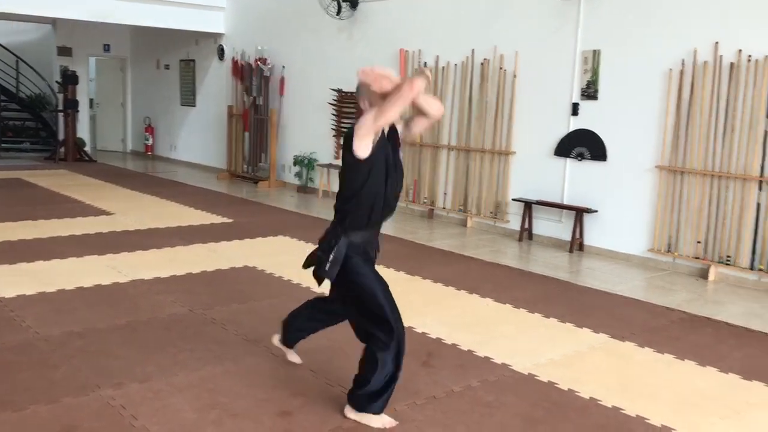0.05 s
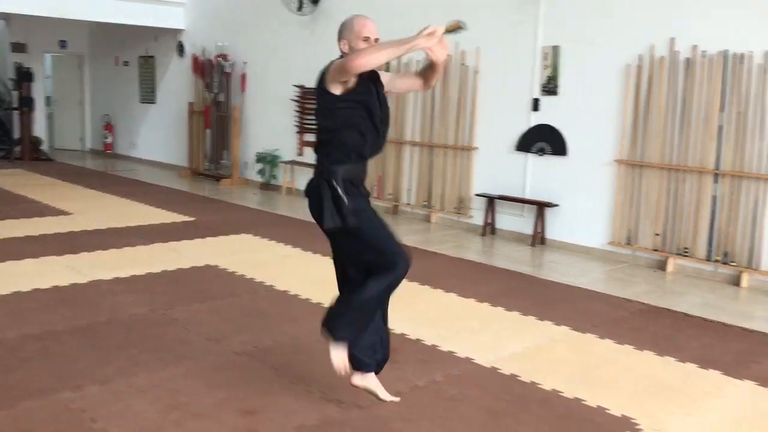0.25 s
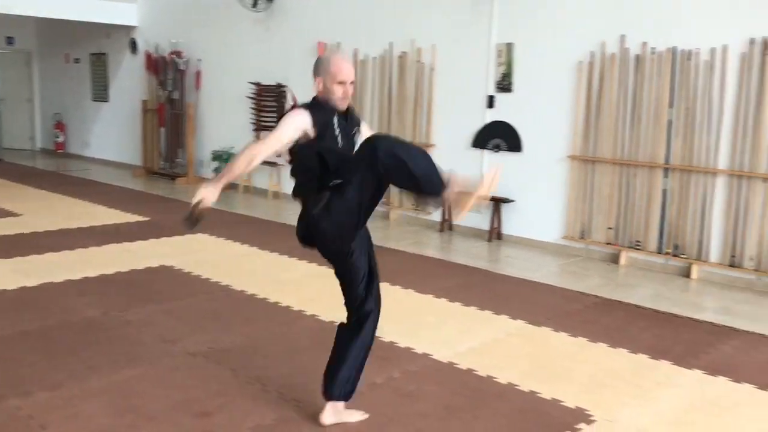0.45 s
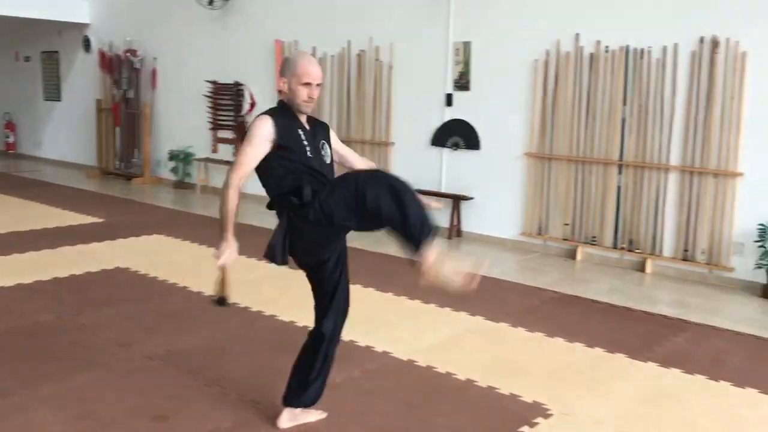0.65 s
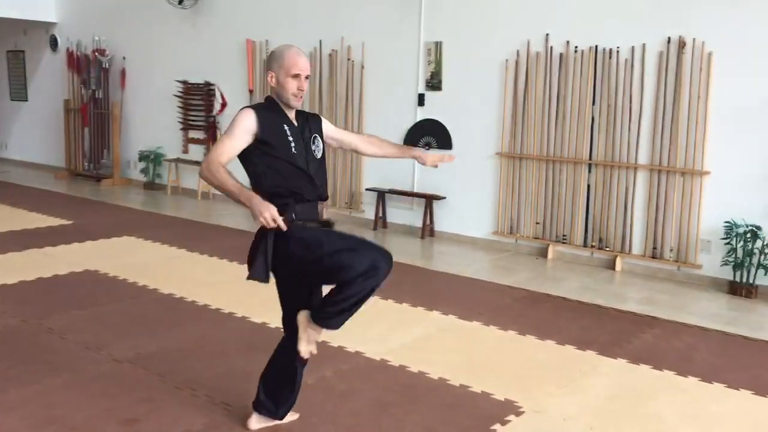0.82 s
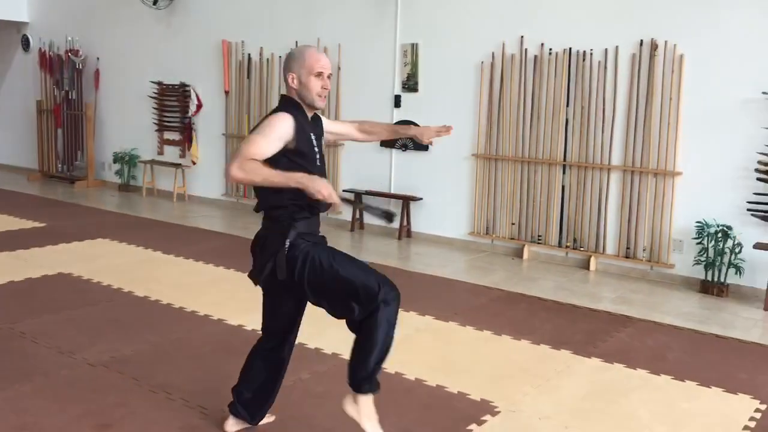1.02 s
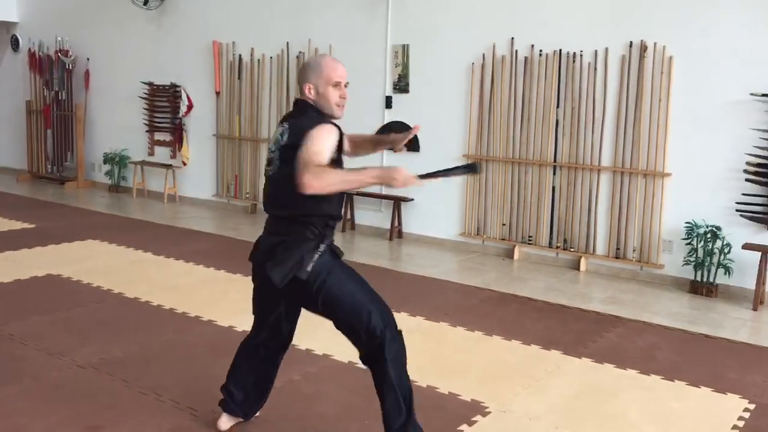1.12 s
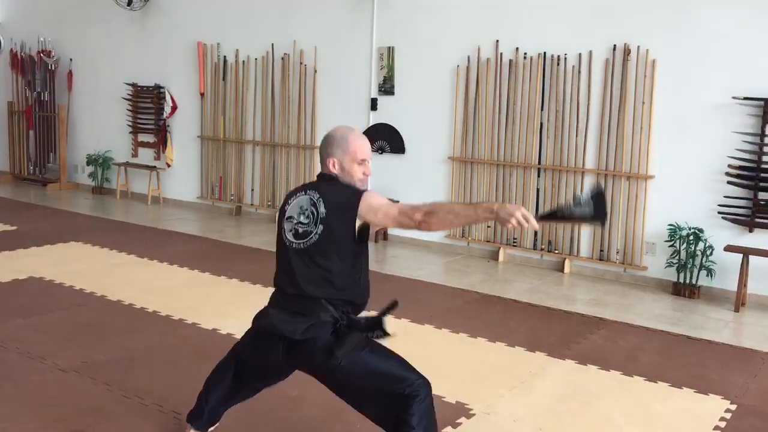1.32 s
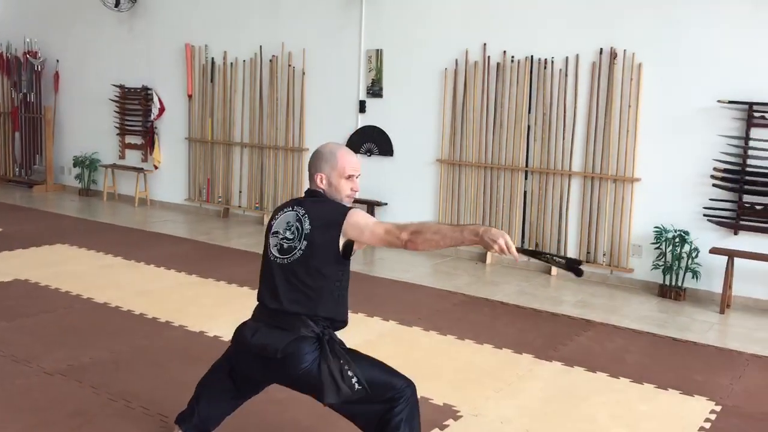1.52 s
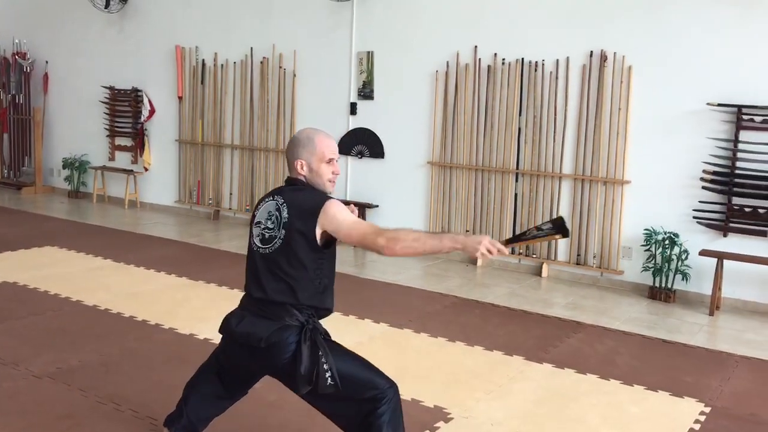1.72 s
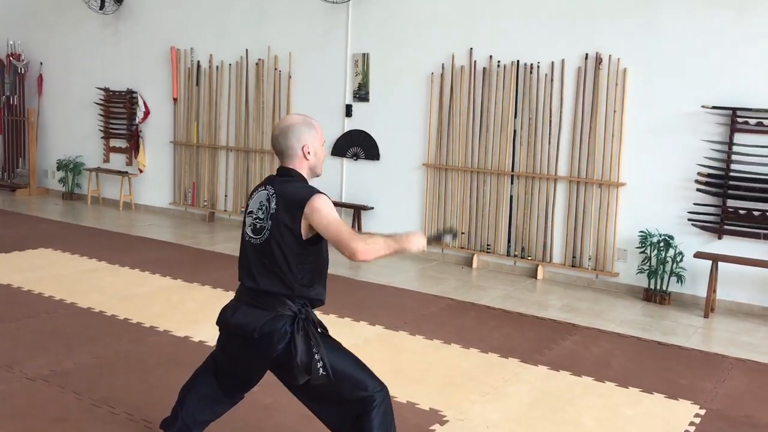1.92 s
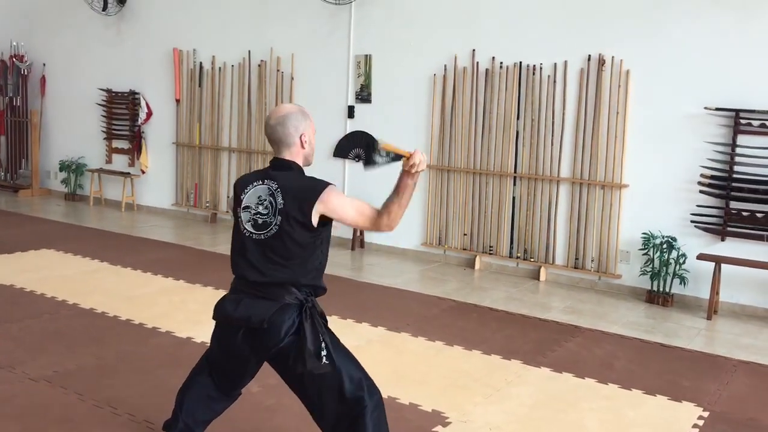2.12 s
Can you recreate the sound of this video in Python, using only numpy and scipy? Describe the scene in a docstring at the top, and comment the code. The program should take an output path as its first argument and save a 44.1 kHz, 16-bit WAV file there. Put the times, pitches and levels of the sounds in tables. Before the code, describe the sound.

A hand fan cracks open after faint clothing swishes, echoing through a training hall.

```python
"""A folding fan snapped open in a hall

A martial artist kicks, steps into a low stance and snaps a fan open in a large, hard-walled hall.
The ribs slide apart, then the leaf cracks taut twice, 8 ms apart; the floor mirrors each crack and
the hall reverberates. Before it come swishes of clothing and a few light slaps, over low thudding
of the mats and steady room noise."""
import sys
import numpy as np
from scipy import signal
from scipy.fft import rfft, irfft, next_fast_len
from scipy.io import wavfile
from scipy.ndimage import uniform_filter1d

SR = 44100
rng = np.random.default_rng(int(sys.argv[2]) if len(sys.argv) > 2 else 0)


def output_pcm(signal):
    """Save a mono or channel-first signal as 16-bit PCM at the path in sys.argv[1].

    Samples are clipped to [-1, 1] before scaling.
    """
    pcm = np.clip(np.atleast_2d(signal).T, -1, 1) * 32767
    wavfile.write(sys.argv[1], SR, np.round(pcm).astype(np.int16))


N = 94815

# Cracks of the leaf. Each row: start in seconds, level in dB, rise and decay of the rib clatter in
# seconds, clatter relative to the pulse in dB, low cutoff in Hz.
CRACK_EVENTS = [(1.3917, 2.03, 0.000053, 0.00034, -12, 2220), (1.3997, 5.6, .0007, 0.00084, 2.5, 1100)]
# Response of ribs and leaf. Each row: frequency in Hz, gain in dB.
FAN_RESPONSE = [(200, -14.5), (900, -5), (1550, 3.5), (2300, -5.5), (3800, 0), (5800, -2.5), (7400, -3.5),
                (9000, -8), (12000, -9.5), (13300, -9.5), (14800, -3.5), (16000, -5)]


def fan_cracks(size=4096, lead_samples=256, flutter_db=-15, flutter_decay_s=.004):
    """Impulse excitation: the leaf snaps taut and shivers as the ribs clatter. One track per crack."""
    lead = lead_samples / SR
    pulse = signal.unit_impulse(size, lead_samples)
    tracks = []
    for start, db, rise, decay, clatter_db, cutoff_hz in CRACK_EVENTS:
        clatter = amp(clatter_db) * rib_clatter(swell(lead, rise, decay, size))
        flutter = amp(flutter_db) * unit_energy(noise(size) * swell(lead, rise, flutter_decay_s, size))
        force = whiten(pulse + clatter) + flutter
        force = signal.lfilter(*signal.butter(1, cutoff_hz, "high", fs=SR), force)
        tracks.append(at(start - lead, amp(db) * unit_energy(colour(force, FAN_RESPONSE))))
    return tracks


def rib_clatter(envelope, passes=6):
    """Dense random impacts have a nearly flat spectrum; here they follow a given envelope."""
    x = noise(len(envelope)) * envelope
    for _ in range(passes):
        x = whiten(x)
        local_rms = np.sqrt(np.abs(uniform_filter1d(x ** 2, size=24)) + 1e-18)
        x = x * envelope / local_rms
    return unit_energy(x)


# Spectrum of the rib scrape and of each slap's tick. Each row: frequency in Hz, gain in dB.
CONTACT_SPECTRUM = [(300, 15), (1000, 3), (2500, -3.5), (5000, 6.5), (8000, -2.5), (15000, -9.5)]


def rib_slide(level_db=-42, grain_db=.5):
    """Sliding friction: the ribs scrape over each other as the fan spreads."""
    grains = noise() * amp(grain_db * unit_rms(uniform_filter1d(noise(), size=60)))
    scrape = unit_rms(colour(grains, CONTACT_SPECTRUM))
    return amp(level_db) * scrape * swell(peak_s=1.347, rise_s=.014, fall_s=.029)


# Slaps of hand, foot and closed fan. Each row: start in seconds, level in dB, decay in seconds,
# resonance and bandwidth in Hz, relative tick level in dB.
SLAP_EVENTS = [(0.111, -26.5, 0.0046, 1700, 1500, -3.5), (0.284, -24, 0.0049, 1700, 1450, -8),
               (0.48, -15.5, 0.00074, 745, 620, -10.5), (1.2936, -20, 0.00067, 1004, 310, -20),
               (1.297, -16, 0.00091, 980, 350, -13), (1.3434, -13, .003, 950, 600, -19),
               (1.3595, -15.5, .001, 1450, 700, -7), (1.374, -16.5, 0.0036, 750, 300, -5)]


def slaps():
    """Damped resonance: each light impact gives a hollow knock and a bright tick."""
    track = np.zeros(N)
    for start, db, decay, hz, width_hz, tick_db in SLAP_EVENTS:
        knock = unit_energy(resonate(burst(decay), hz, width_hz))
        tick = amp(tick_db) * unit_energy(colour(burst(decay), CONTACT_SPECTRUM))
        track += at(start, amp(db) * (knock + tick))
    return track


# Quick moves. Each row: peak time in seconds, level in dB, rise and fall in seconds.
SWISH_EVENTS = [(.105, -57.5, .025, .02), (.17, -62.5, 0.027, 0.11), (0.283, -59.5, .02, .015),
                (0.347, -61, .01, .012), (0.623, -49, 0.038, 0.088), (1.16, -71, .025, 0.014),
                (1.22, -61.5, 0.029, 0.018), (1.32, -58, .02, 0.021), (1.955, -62.5, .008, .008)]
# Spectrum of rubbing cloth. Each row: frequency in Hz, gain in dB.
CLOTH_SPECTRUM = [(500, -3), (1200, 5.5), (2200, 2), (3800, 1), (5400, 3.5), (7500, -2), (12000, -4),
                  (16000, -7)]


def clothing():
    """Friction noise: cloth hisses with each quick move."""
    effort = sum(amp(db) * swell(peak, rise, fall) for peak, db, rise, fall in SWISH_EVENTS)
    return effort * steady_noise(CLOTH_SPECTRUM)


def kick(level_db=-53.5):
    """Flow noise: the kicking leg pushes a dull rush of air."""
    rush = unit_rms(resonate(noise(), hz=880, width_hz=520))
    return amp(level_db) * rush * swell(peak_s=.568, rise_s=.12, fall_s=.025)


def floor_bounce(x, delay_s=.00355, gain_db=-7):
    """Image source: the floor adds a delayed, weaker copy to the direct sound."""
    return x + amp(gain_db) * at(delay_s, x)


# Echoes from ceiling and walls. Each row: delay in seconds, level in dB, smear in seconds.
EARLY_ECHOES = [(.0238, -9, .003), (.0335, -14, .003), (.054, -13, .007)]
# Decay of the hall. Each row: frequency in Hz, time to fall 60 dB in seconds.
REVERB_TIMES = [(200, 1), (700, 0.91), (1500, 2.42), (3500, 1.91), (6000, 1.56), (9000, 1.14),
                (12000, 0.74), (16000, 0.24)]
# Initial spectrum of the tail. Each row: frequency in Hz, gain in dB.
TAIL_SPECTRUM = [(200, 8.5), (600, 6), (1400, -3), (2500, 0.5), (4500, -1.5), (7500, -1.5), (11000, 2.5),
                 (15000, 4)]


def hall(x, size=65536, tail_db=-3.5, onset_s=.023, build_s=.009):
    """Reverberation: scattered echoes, then a diffuse tail whose highest treble dies first."""
    t, hz = clock(size), np.fft.rfftfreq(size, 1 / SR)
    diffuse = rfft(noise(size)) * amp(log_interp(TAIL_SPECTRUM, hz))  # drawn anew for each sound
    centres, t60s = np.array(REVERB_TIMES).T
    tail = np.zeros(size)
    for t60, weights in zip(t60s, np.eye(len(centres))):
        band = irfft(diffuse * np.interp(hz, centres, weights))
        tail += band * amp(-60 * t / t60)
    build_up = 1 - np.exp(-np.maximum(t - onset_s, 0) / build_s)
    early = sum(at(delay, amp(db) * burst(smear)) for delay, db, smear in EARLY_ECHOES)[:size]
    return signal.fftconvolve(x, early + amp(tail_db) * unit_energy(tail * build_up))[:N]


# Spectrum of the matted floor. Each row: frequency in Hz, gain in dB.
MAT_SPECTRUM = [(20, -48), (31, 9), (42, -31), (52, 21), (62, 2.5), (76, 13), (95, -19.5), (160, -65.5)]
# Envelope of the thudding. Each row: time in seconds, level in dB.
MAT_LEVELS = [(0, -45.5), (.45, -45.5), (.65, -42), (.85, -40.5), (1.0, -39), (1.148, -47), (1.26, -39.5),
              (1.43, -41), (1.58, -44.5), (1.78, -47), (1.86, -36), (1.969, -52.5), (2.15, -45)]


def mat_thudding():
    """Amplitude modulation: low noise of the matted floor swells with the steps."""
    rumble = steady_noise(MAT_SPECTRUM)
    local_rms = np.sqrt(uniform_filter1d(rumble ** 2, size=10000))
    times, levels_db = np.array(MAT_LEVELS).T
    return unit_rms(rumble / local_rms) * amp(np.interp(clock(), times, levels_db))


# Spectra of the steady air and of the fading wash. Each row: frequency in Hz, gain in dB.
AIR_SPECTRUM = [(60, 0), (90, -2.5), (112, 2), (145, -7), (220, -5.5), (320, -15), (500, -18), (950, -20),
                (1800, -27), (3300, -33), (6000, -41.5), (10000, -50), (16000, -41)]
WASH_SPECTRUM = [(400, -7.5), (1000, 7), (2200, -5), (3400, -0.5), (6000, -17.5), (10000, -24),
                 (16000, -32)]


def room_noise(air_db=-45.5, wash_db=-56, fall_db_per_s=9):
    """Exponential decay: a wash of earlier movement sinks into the hall's steady noise floor."""
    air = amp(air_db) * steady_noise(AIR_SPECTRUM)
    wash = amp(wash_db - fall_db_per_s * clock()) * steady_noise(WASH_SPECTRUM)
    return air + wash


def amp(db):
    return 10 ** (np.asarray(db) / 20)


def unit_rms(x):
    return x / np.sqrt(np.mean(x ** 2))


def unit_energy(x):
    return x / np.sqrt(np.sum(x ** 2))


def clock(size=N):
    return np.arange(size) / SR


def noise(size=N):
    return rng.standard_normal(size)


def at(start_s, x):
    """Pure delay, padded or cut to the scene's length."""
    return np.pad(x, (max(int(start_s * SR), 0), N))[:N]


def log_interp(table, hz):
    """Interpolation on a log-frequency axis."""
    freqs, values = np.array(table, float).T
    return np.interp(np.log(np.maximum(hz, 1)), np.log(freqs), values)


def whiten(x):
    """Whitening: every frequency keeps its phase and gets unit magnitude."""
    return irfft(np.exp(1j * np.angle(rfft(x))))


def colour(x, table, size=2048):
    """Minimum-phase filtering: folding the cepstrum makes the response causal."""
    gain = amp(log_interp(table, np.fft.rfftfreq(size, 1 / SR)))
    cepstrum = irfft(np.log(gain))
    cepstrum[1:size // 2] *= 2
    cepstrum[size // 2 + 1:] = 0
    response = irfft(np.exp(rfft(cepstrum)))[:size // 2]
    return signal.oaconvolve(x, response)[:len(x)]


def steady_noise(table):
    """Stationary noise of the given spectrum, rms 1."""
    size = next_fast_len(N, True)
    gain = amp(log_interp(table, np.fft.rfftfreq(size, 1 / SR)))
    return unit_rms(irfft(rfft(noise(size)) * gain)[:N])


def resonate(x, hz, width_hz):
    """Two resonators in cascade, the second twice as wide."""
    for width in (width_hz, 2 * width_hz):
        x = signal.lfilter(*signal.iirpeak(hz, hz / width, fs=SR), x)
    return x


def burst(decay_s, size=4096):
    """Exponentially damped noise, energy 1."""
    return unit_energy(noise(size) * np.exp(-clock(size) / decay_s))


def swell(peak_s, rise_s, fall_s, size=N):
    """Gaussian rise and exponential fall."""
    age = clock(size) - peak_s
    exponent = np.where(age < 0, (age / rise_s) ** 2, age / fall_s)
    return np.exp(-np.minimum(exponent, 20))


def scene(hall_send_db=-1.5):
    """Superposition: direct sound, reflections and background add in one channel."""
    cracks = fan_cracks()
    movement = rib_slide() + slaps() + kick() + clothing()
    reverb = amp(hall_send_db) * sum(hall(source) for source in [*cracks, movement])
    return (floor_bounce(sum(cracks) + movement) + reverb + mat_thudding() + room_noise())[None]


def record(dry, low_hz=32, soft_top_hz=15400, top_hz=16300):
    """Band limiting: the deepest bass is dropped, the top rounded off and then cut."""
    dry = signal.sosfilt(signal.butter(4, low_hz, "high", fs=SR, output="sos"), dry)
    dry = signal.sosfiltfilt(signal.butter(8, soft_top_hz, fs=SR, output="sos"), dry)
    return signal.sosfilt(signal.ellip(8, .2, 80, top_hz, fs=SR, output="sos"), dry)


dry = scene()
out = record(dry)
output_pcm(out)
```